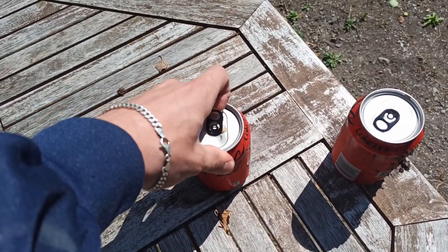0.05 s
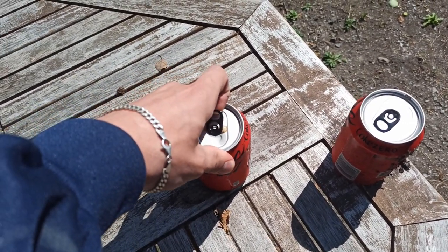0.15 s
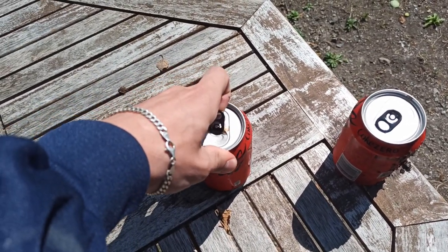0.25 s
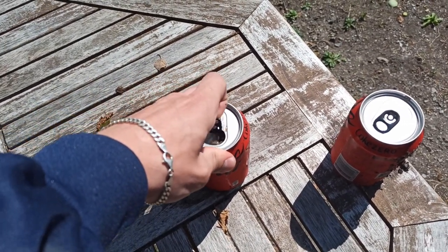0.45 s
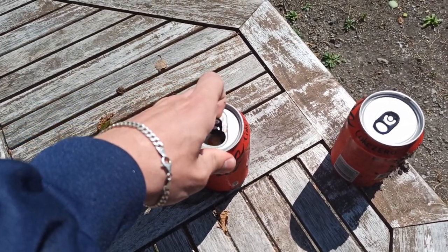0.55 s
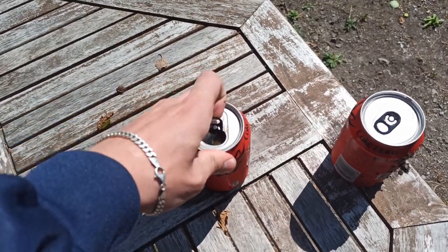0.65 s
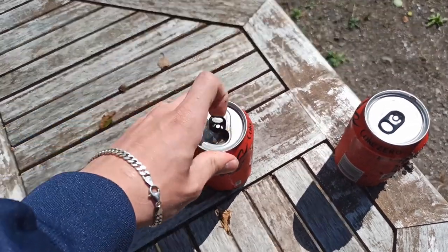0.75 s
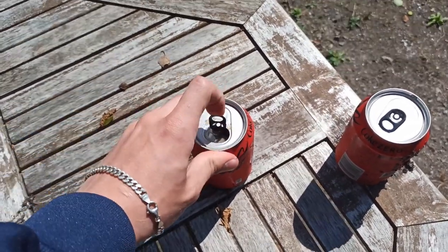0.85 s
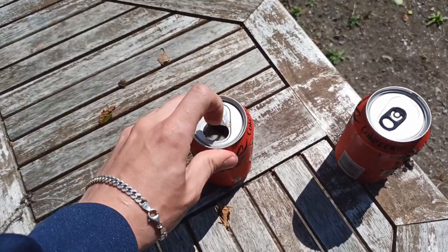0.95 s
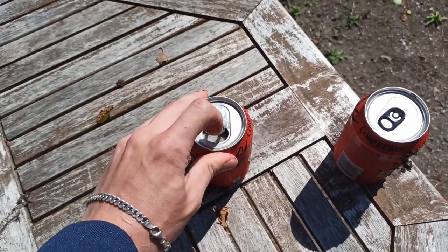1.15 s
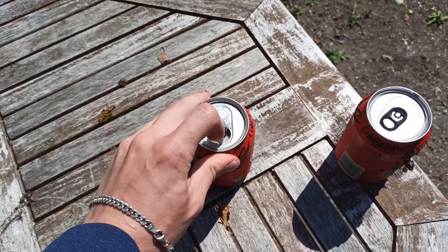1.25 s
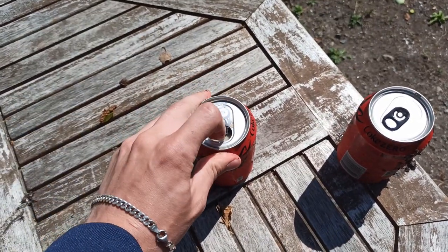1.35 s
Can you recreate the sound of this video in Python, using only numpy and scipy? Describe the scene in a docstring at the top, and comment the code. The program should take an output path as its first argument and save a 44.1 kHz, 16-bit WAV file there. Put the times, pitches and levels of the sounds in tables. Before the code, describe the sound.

A drink can cracks open with sharp clicks, a pop and a short hiss.

```python
"""Opening a drink can in the garden

On a wooden table, close to the microphone, the seal cracks and the tab clicks and creaks as it is
levered up. The lid panel pops in, gas hisses out, and the tab ticks once more as it is pushed back.
Farther off, a thin whistle and a low hum lie in the quiet outdoor air."""
import sys
import numpy as np
from scipy import signal
from scipy.fft import rfft, irfft
from scipy.io import wavfile

SR = 44100
rng = np.random.default_rng(int(sys.argv[2]) if len(sys.argv) > 2 else 0)


def generate_wav(signal):
    """Clip the signal to [-1, 1] and save it as 16-bit WAV at the path in sys.argv[1]."""
    frames = np.transpose(np.atleast_2d(signal))
    scaled = np.clip(frames, -1, 1) * 32767
    pcm = np.round(scaled).astype(np.int16)
    wavfile.write(sys.argv[1], SR, pcm)


N = 61739
T = np.arange(N) / SR


def amp(db):
    """Decibels to gain."""
    return 10 ** (np.asarray(db) / 20)


def unit(x):
    """Scales to rms 1."""
    return x / np.sqrt(np.mean(abs(x) ** 2) + 1e-20)


def add(mix, s, sound):
    """Mixes a sound in at s seconds."""
    part = mix[round(s * SR):][:len(sound)]
    part += sound[:len(part)]


def colour(x, points):
    """Minimum-phase filter through points of (frequency [Hz], gain [dB])."""
    size = 4096
    hz, db = np.transpose(points)
    bins_hz = abs(np.fft.fftfreq(size, 1 / SR))
    log_gain = np.log(amp(np.interp(np.log(bins_hz + 1), np.log(hz + 1), db)))
    taps = np.fft.ifft(np.exp(np.conj(signal.hilbert(log_gain)))).real
    return signal.fftconvolve(x, taps[:size // 2])[:len(x)]


def noise(points):
    """Steady noise of rms 1 with the given spectrum."""
    hz, db = np.transpose(points)
    gain = amp(np.interp(np.log(np.fft.rfftfreq(N, 1 / SR) + 1), np.log(hz + 1), db))
    return unit(irfft(rfft(rng.standard_normal(N)) * gain, N))


def wander(width_hz):
    """A random complex drift of rms 1."""
    white = rng.standard_normal((N, 2)) @ [1, 1j]
    return unit(np.fft.ifft(white / (1 + (2 * np.fft.fftfreq(N, 1 / SR) / width_hz) ** 4)))


def fade(t, t60):
    """Exponential decay, 60 dB in t60 seconds."""
    return np.exp(-np.log(1000) * t / t60)


def mode(t, hz, t60, rise):
    """A ring that swells briefly and dies away."""
    return np.sin(2 * np.pi * hz * t) * fade(t, t60) * (1 - np.exp(-t / rise))


def ring(modes, s):
    """Modes of alternating sign, set ringing at s seconds."""
    t = np.maximum(T - s, 0)
    return sum((-1) ** k * amp(db) * mode(t, hz, t60, rise)
               for k, (hz, db, t60, rise) in enumerate(modes))


def tap(points):
    """One sharp, dry tap with the given spectrum."""
    return colour(signal.unit_impulse(SR // 10), points)


# Garden air all around the microphone: (frequency [Hz], spectral level [dB])
GARDEN_AIR = [(20, -36), (50, -20), (80, 1), (115, -4.5), (180, -3.5), (260, -10), (430, -11),
              (1100, -19.5), (4500, -24.5), (5000, -33.5), (6500, -22.5), (7500, -27.5), (12000, -35),
              (16000, -31)]


def outdoors(air_db=-58, hum_hz=146.2, hum_db=-58.5, fade_db_per_s=4):
    """Quiet air with a distant hum that wavers and slowly fades."""
    waver = 1 + 0.54 * wander(width_hz=5.2)
    hum = (np.exp(2j * np.pi * hum_hz * T) * waver).real
    return amp(air_db) * noise(GARDEN_AIR) + amp(hum_db - fade_db_per_s * T) * unit(hum)


# A whistle far from the table: (time [s], pitch [Hz], level [dB])
FAR_WHISTLE = [(0.759, 6100, -78), (.784, 6130, -59), (.80, 6080, -77), (0.825, 6140, -65),
               (.895, 6290, -63), (.98, 6360, -65), (1.08, 6280, -67), (1.3, 6260, -84)]


def whistle(jitter_hz=130):
    """A thin whistle, perhaps a far bird, arches up, grows breathier and fades."""
    s, hz, db = np.transpose(FAR_WHISTLE)
    pitch = np.interp(T, s, hz) + jitter_hz * wander(width_hz=600).real
    carrier = np.exp(2j * np.pi * np.cumsum(pitch) / SR)
    breath_share = np.interp(T, s[[0, -1]], [0.25, 0.95])
    blur = np.sqrt(1 - breath_share) + np.sqrt(breath_share) * wander(width_hz=560)
    envelope = amp(np.interp(T, s, db, left=-np.inf, right=-np.inf))
    return unit((carrier * blur).real) * envelope


# What table and garden throw back to the microphone: (frequency [Hz], spectral level [dB])
REFLECTIONS = [(45, -10), (110, 5), (700, -4), (2500, -1), (6000, 0), (15000, -4)]


def reflections(x, near_db=-20.5, near_t60=0.11, far_db=-28, far_t60=0.44):
    """Quick reflections from table and hand, and a faint longer tail from the garden."""
    tail, onset = np.zeros(N), np.minimum(T / 0.0036, 1)
    for db, t60 in (near_db, near_t60), (far_db, far_t60):
        taps = noise(REFLECTIONS) * fade(T, t60) * onset
        tail += amp(db) * taps / np.linalg.norm(taps)
    return signal.fftconvolve(x, tail)[:N]


# A fingertip on the tab, faint even up close: (centre time [s], half length [s], level [dB])
FINGER_RUBS = [(0.992, 0.0094, -56), (1.019, 0.013, -56)]
# Skin sliding on metal: (frequency [Hz], spectral level [dB])
RUB_SPECTRUM = [(400, -36), (1000, -11), (1500, -0.5), (2500, -3), (3200, -18), (7000, -8), (14000, -21)]
# The tab ticking against the open lid: (frequency [Hz], gain [dB])
TICK_SPECTRUM = [(700, -29), (1150, -11.5), (1550, -1), (1900, -11), (2400, -8), (3200, -27), (5300, -21),
                 (6900, -3), (7600, -15), (9500, -11), (13000, -24.5)]


def finger(tick_s=0.9954, tick_db=-3.5):
    """Soft scrapes and one tick as the tab is pushed back."""
    strokes = sum(amp(db) * np.exp(-((T - s) / half) ** 2) for s, half, db in FINGER_RUBS)
    out = noise(RUB_SPECTRUM) * strokes
    add(out, tick_s, amp(tick_db) * tap(TICK_SPECTRUM))
    return out


# The metal of the can, close to the microphone: (frequency [Hz], level [dB], t60 [s])
CAN_MODES = [(598, -26.5, 0.014), (1000, -27, 0.008), (1560, -20.5, 0.016), (1926, -15.5, 0.0166),
             (2354, -14, 0.019), (2760, -15.5, .016), (3420, -24, 0.01), (3916, -15, 0.013),
             (4613, -12, 0.021), (5050, -16, 0.016), (6100, -20, 0.021), (6640, -21.5, 0.0123),
             (7550, -13.5, 0.016), (13000, -23.5, 0.013), (15140, -17.5, .006)]


def can_ring():
    """The can's thin shell rings briefly after one tap."""
    t = T[:SR // 10]
    return sum((-1) ** k * amp(db) * np.sin(2 * np.pi * hz * t) * fade(t, t60)
               for k, (hz, db, t60) in enumerate(CAN_MODES))


def creak(centre_s=0.2775, half_s=0.017, db=-43.5, slips_per_s=1300):
    """Dense tiny slips of the strained tab ring the can."""
    slips = rng.standard_normal(N) * (rng.random(N) < slips_per_s / SR)
    ringing = unit(signal.fftconvolve(slips, can_ring())[:N])
    return amp(db) * ringing * np.exp(-((T - centre_s) / half_s) ** 4)


# The seal's first snaps, at close range: (time [s], gain [dB])
SEAL_CRACKS = [(0.2438, 9.5), (0.2456, 12)]
# The colour of one snap: (frequency [Hz], gain [dB])
SEAL_SPECTRUM = [(200, -28), (520, -10.5), (800, -19), (1200, -13), (1650, -2.5), (2300, -8), (3700, -16),
                 (4500, -7), (5600, -9), (6700, 2.5), (7600, -7.5), (12000, -20), (16000, -17)]


def seal(ring_db=-31):
    """The scored seal cracks in two dry snaps that faintly ring the can."""
    out = np.zeros(N)
    snap = tap(SEAL_SPECTRUM) + amp(ring_db) * can_ring()
    for s, db in SEAL_CRACKS:
        add(out, s, amp(db) * snap)
    return out


# Tab and lid clicking right by the microphone:
# (time [s], level [dB], ring pitch [Hz], relative ring level [dB], low-shelf gain [dB])
TAB_CLICKS = [(0.2644, -23, 6220, -1, -2), (0.2794, -29, 5500, 4.5, 2), (0.2840, -24.5, 4500, 5.5, -1),
              (0.2865, -29, 2200, -1.5, 6.5), (0.2895, -23, 5700, -4, 2), (0.3047, -32.5, 4480, 3, 4),
              (0.4631, -21, 4000, -2, -6.5), (0.468, -32, 2400, 3, 5), (0.48355, -22, 7400, 1.5, -5),
              (0.4858, -15.5, 7570, 5, -5.5), (0.4888, -19, 7560, 4, -2.5), (0.528, -29, 6250, -9, -9.5),
              (0.6620, -44, 6400, 10, 3)]
# Metal giving way in each click: (frequency [Hz], spectral level [dB])
METAL_CRACKLE = [(150, -20), (500, -6), (900, -8.5), (2000, 0), (5000, -1), (7500, 5.5), (12000, -4.5),
                 (16000, -2)]


def tab(crackle_db=-13, snap_db=-8.5, shelf_hz=2400):
    """Each slip of the tab snaps, crackles, rings the can and sounds one ring of the strained lid."""
    out, body, crackle = np.zeros(N), can_ring(), noise(METAL_CRACKLE)
    t = T[:len(body)]
    lowpass = signal.butter(1, shelf_hz, fs=SR)
    envelope = amp(crackle_db) * fade(t, t60=0.018) + amp(snap_db) * fade(t, t60=0.0022)
    for s, db, ring_hz, ring_db, shelf_db in TAB_CLICKS:
        click = body + crackle[round(s * SR):][:len(t)] * envelope
        click += (amp(shelf_db) - 1) * signal.lfilter(*lowpass, click)
        lid = amp(ring_db) * mode(t, ring_hz, t60=0.0047, rise=0.00014)
        add(out, s, amp(db) * (click + lid))
    return out


# Gas leaving the opening, close up: (frequency [Hz], spectral level [dB])
GAS_HISS = [(200, -15.5), (500, -9.5), (680, -0.5), (1000, -18), (1400, -19), (2100, -6), (2450, 2.5),
            (3200, 1), (4300, -5), (5300, -12), (6100, -2.5), (7600, -5.5), (11000, -19.5), (13000, -12),
            (16000, -19)]


def gas(start_s, db=-39, rise_s=0.02, hold_s=0.049, fall_db_per_s=202, flutter_db=1.5):
    """A fluttering jet holds briefly, then dies as the pressure drops."""
    t = np.maximum(T - start_s, 0)
    level_db = db - fall_db_per_s * np.maximum(t - hold_s, 0)
    level_db += flutter_db * wander(width_hz=500).real
    return noise(GAS_HISS) * np.minimum(t / rise_s, 1) * amp(level_db)


# The score line tearing, right by the microphone: (frequency [Hz], level [dB], t60 [s], rise [s])
TEAR_MODES = [(5035, -15, 0.013, 0.0012), (6135, -9, 0.018, .0012), (6790, -4.5, .009, 0.0013),
              (7370, -13, .013, 0.0018)]
# The lid panel swinging in by jerks: (time [s], level [dB])
PANEL_SWING = [(0.5129, 0), (.5150, -5.5), (.5392, -25), (.662, -32), (.748, -40)]
# The panel's ring at each jerk: (frequency [Hz], level [dB], t60 [s], rise [s])
PANEL_MODES = [(2270, -7.5, .008, 0.0014), (2720, -1.5, .0105, 0.0016), (3310, -12, 0.0071, .0012),
               (3905, -13.5, .009, .001)]
# The hollow inside the can: (frequency [Hz], level [dB], t60 [s], rise [s])
HOLLOW_MODES = [(652, -16.5, .017, .002), (759, -18.5, .02, 0.0023), (1270, -19, 0.01, 0.00035)]
# The first burst of gas: (frequency [Hz], spectral level [dB])
GAS_BURST = [(30, -19), (120, -4.5), (380, -11), (950, -23), (1400, -8), (2000, -2), (7000, -2.5),
             (12000, -1.5), (16000, -5)]


def pop(start_s, thump_db=-33, thump_width_s=0.0017, burst_db=-18.5, burst_width_s=0.003):
    """The seal tears open: the panel swings in, the hollow can booms, and gas bursts out."""
    tear_s, thump_s, burst_s = start_s - 0.0007, start_s + 0.00031, start_s + 0.0023
    panel = sum(amp(db) * ring(PANEL_MODES, s) for s, db in PANEL_SWING)
    u = (T - thump_s) / thump_width_s
    thump = amp(thump_db) * (1 - 2 * u) * np.exp(-u ** 2)  # the dull push through can and table
    burst = amp(burst_db) * noise(GAS_BURST) * np.exp(-((T - burst_s) / burst_width_s) ** 2)
    return ring(TEAR_MODES, tear_s) + panel + ring(HOLLOW_MODES, start_s) + thump + burst


def scene():
    """The can up close on its table, with the garden behind it, in mono."""
    pop_s = 0.5113
    can = seal() + tab() + creak() + pop(pop_s) + gas(pop_s) + finger()
    return (can + reflections(can) + whistle() + outdoors())[None]


# The overall colour of the sound as heard: (frequency [Hz], gain [dB])
HEARD_RESPONSE = [(20, 0), (7650, 1), (7850, -7.5), (8400, -8.5), (8800, -22.5), (11400, -16), (11700, -3.5),
                  (15700, -5.5), (16100, -16)]


def record(dry):
    """The sound as heard, with a deep dip in the upper treble and a steep cut above it."""
    cutoff_hz = 16100
    lowpass = signal.firwin(511, cutoff_hz, window=("kaiser", 9), fs=SR)
    return signal.fftconvolve(colour(dry[0], HEARD_RESPONSE), lowpass, "same")[None]


dry = scene()
out = record(dry)
generate_wav(out)
```